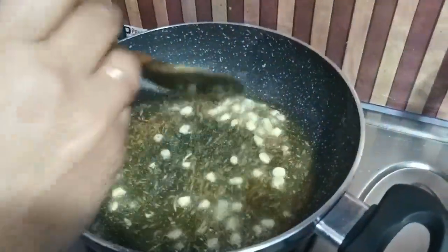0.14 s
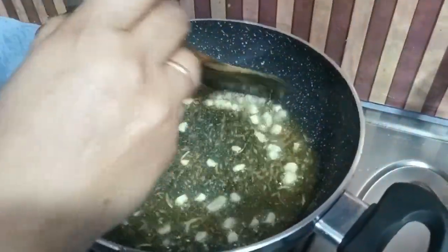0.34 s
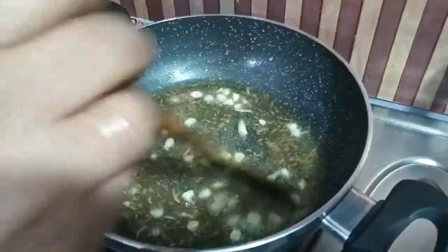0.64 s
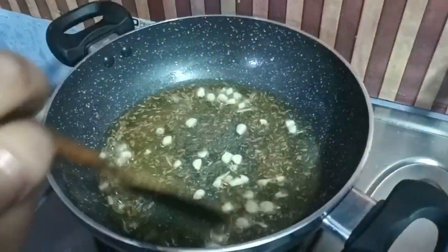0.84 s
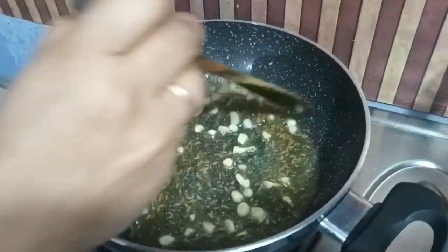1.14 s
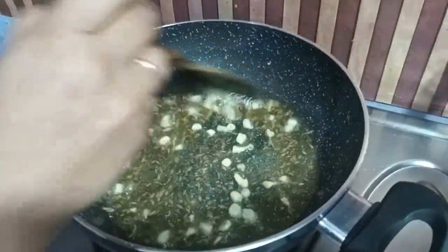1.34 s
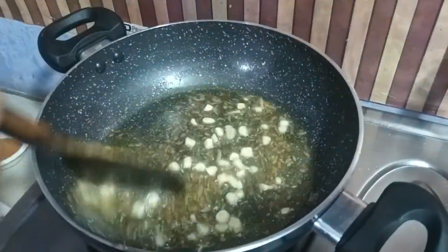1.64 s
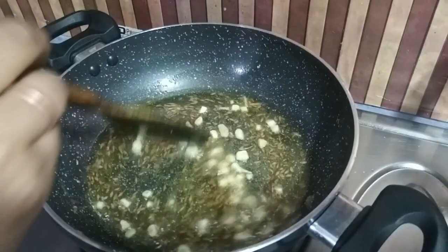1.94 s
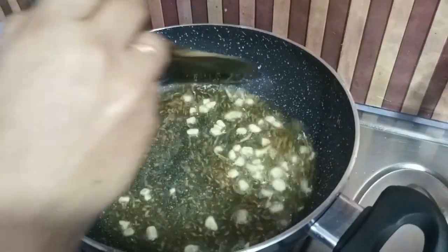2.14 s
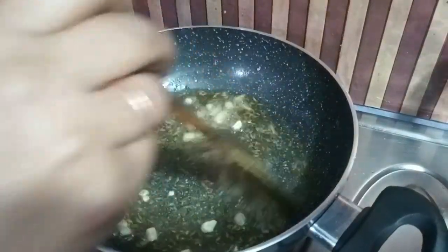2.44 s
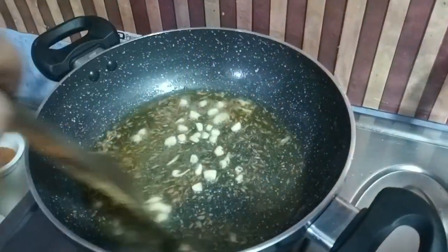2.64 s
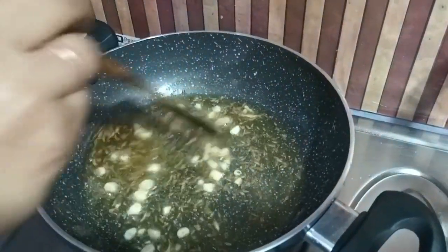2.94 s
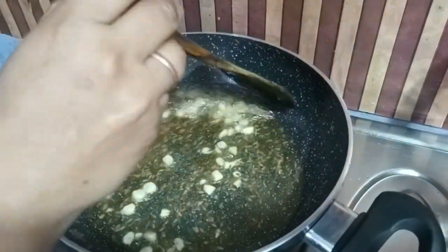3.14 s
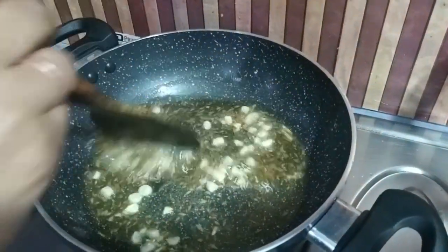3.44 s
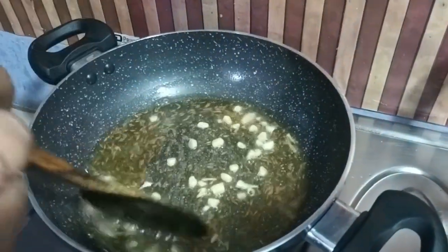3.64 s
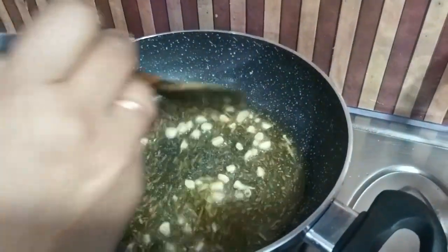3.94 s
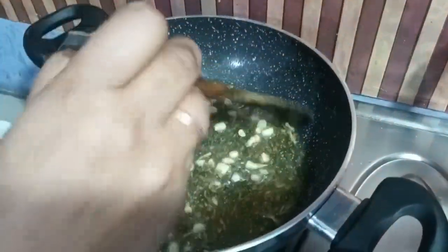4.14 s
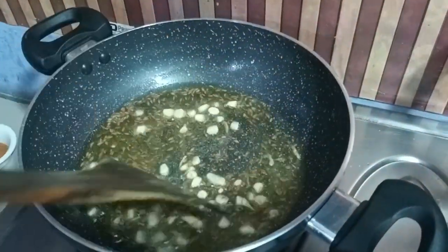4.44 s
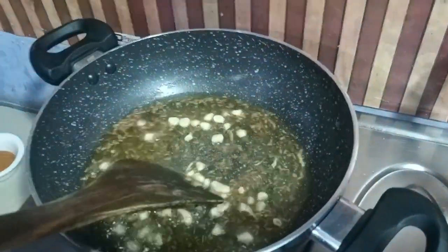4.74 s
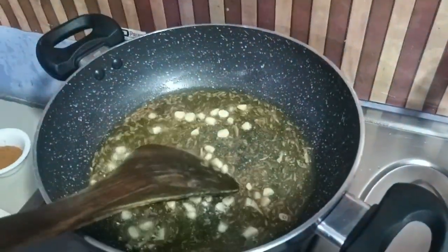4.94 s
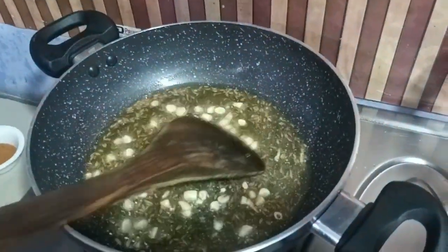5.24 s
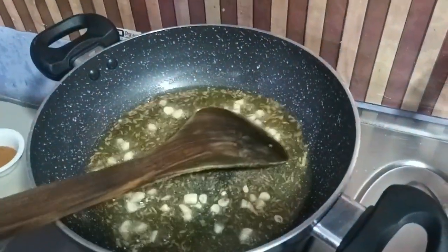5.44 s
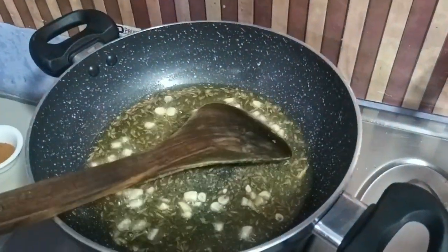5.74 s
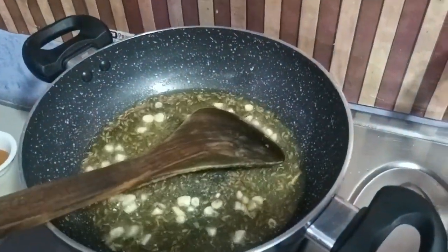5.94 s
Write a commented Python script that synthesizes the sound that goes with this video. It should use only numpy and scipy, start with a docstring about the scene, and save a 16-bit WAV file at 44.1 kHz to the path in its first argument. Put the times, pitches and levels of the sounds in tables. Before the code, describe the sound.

Garlic and seeds fry in a deep pan, heard close in a small kitchen with a short room reflection and rolled-off treble. Fine bright sizzle runs throughout, its coarser bubbling gradually fading. Two hard seed cracks come within the first 0.2 s over low spatula rubbing. A wooden knock and scrape land around 0.8-0.9, a stronger hollow clack at 1.27 with the pan ringing. Near 1.9 the blade knocks and squeaks; from 2.0 to 2.8 dull bumps, most tightly bunched around 2.5, mix with a low shudder, pops and wet spits. A rub at 2.8 precedes another loud clack at 3.2. Spits flare around 3.8-3.9, then a duller knock, bump and rub at 4.15. Afterwards mostly sizzle remains: a faint squeak at 4.8, a longer soft scrape from 5.05, a tiny crack at 5.8, and a last faint bump and touch around 5.9.

```python
"""Chopped garlic and seeds sizzle in hot oil in a deep pan, close to a phone in a small kitchen.
From the start, filtered random clicks make the steam bubbles, noise cracks make the popping seeds, and
a wooden spatula knocks and rubs the pan into its low ring, pushing wet garlic onto hot metal, which spits.
From about two seconds in, a run of dull sine bumps comes with a low noise shudder, and the edge squeaks
now and then; later the strokes are sparser and the coarse bubbles fainter, with two last soft bumps."""
import sys
import numpy as np
from scipy import signal
from scipy.fft import rfft, irfft, next_fast_len
from scipy.io import wavfile
from scipy.ndimage import uniform_filter1d

SR = 44100
rng = np.random.default_rng(int(sys.argv[2]) if len(sys.argv) > 2 else 0)


def store_wav(level_fs):
    """Save 16-bit WAV to argv[1]."""
    pcm = np.round(np.clip(np.atleast_2d(level_fs), -1, 1) * 32767)
    wavfile.write(sys.argv[1], SR, pcm.T.astype(np.int16))


N = 268991
T = np.arange(N) / SR
SECOND = T[:SR]
KITCHEN_T60_S = 0.24
TOP_HZ = 9620  # upper limit of the phone, and of a seed's crack


def undb(db):
    """Decibels to gain."""
    return 10 ** (np.asarray(db) / 20)


def unit(x):
    """Scale to rms 1."""
    return x / np.sqrt(np.mean(x ** 2))


def add(out, start_s, x):
    """Mix a sound in at a time."""
    i = max(int(start_s * SR), 0)
    out[i:i + len(x)] += x[:N - i]


def shape(x, gain):
    """Filter by a gain that is a function of frequency."""
    n = next_fast_len(len(x) + SR // 10)
    hz = np.maximum(np.arange(n // 2 + 1) * SR / n, 1)
    return irfft(rfft(x, n) * gain(hz), n)[:len(x)]


def colour(x, points):
    """Filter by a spectrum of (Hz, dB) points."""
    hz, db = np.transpose(points)
    return shape(x, lambda f: undb(np.interp(np.log(f), np.log(hz), db)))


def hump(f, hz, octaves):
    """A bell on the octave scale."""
    return np.exp(-.5 * (np.log2(f / hz) / octaves) ** 2)


def noise_hump(size, hz, octaves):
    """Noise gathered around one pitch, at rms 1."""
    return unit(shape(rng.standard_normal(size), lambda f: hump(f, hz, octaves)))


def walk(rate):
    """Smooth random wander of rms 1, with this many new targets per second."""
    k = int(SR / rate)
    steps = np.repeat(rng.standard_normal(N // k + 1), k)
    return unit(uniform_filter1d(steps, k)[:N])


def clicks(per_s, scatter_db, size):
    """Clicks at random moments, many small and a few large."""
    hit = rng.random(size) < per_s / SR
    strength = undb(scatter_db * np.minimum(rng.exponential(size=size), 5))
    return hit * strength * rng.choice([-1, 1], size)


def kitchen(x, wet_db, t60):
    """Direct sound plus a short wash from the tiles and worktop."""
    decay = np.exp(-np.log(1000) * SECOND / t60)
    tail = rng.standard_normal(SR) * decay * (SECOND > .003)
    return x + undb(wet_db) * signal.fftconvolve(x, tail / np.linalg.norm(tail))[:N]


def room_tone():
    """A faint low rumble of the kitchen, from noise that wanders in level."""
    return undb(-74) * noise_hump(N, 90, 1.0) * undb(2.5 * walk(6.4))


# Air resonances of the bowl. Each row: centre in Hz, width in Hz, boost (or dip, if negative) in dB.
BOWL = [(1280, 12, -2.5), (1359, 154, 17.5), (1856, 150, 6.5), (6660, 270, 3.5), (6900, 140, -6)]


def bowl(f):
    """Gain of the air resonances above the oil, each a peak or dip on a flat response."""
    return 1 + sum((undb(db) - 1) / (1 + (2 * (f - hz) / width) ** 2) for hz, width, db in BOWL)


# Fine fizz of the oil, as a spectrum. Each row: frequency in Hz, gain in dB.
FIZZ_SPECTRUM = [(500, -43.5), (950, -69), (1200, -26.5), (1650, -17.5), (2200, -10), (3400, -6),
                 (4900, -6.5), (5700, -1.5), (6700, 0.5), (7300, 1), (8000, -6.5), (8700, -4.5),
                 (9600, -3.5)]
# Larger bubbles around the garlic, as a spectrum. Each row: frequency in Hz, gain in dB.
COARSE_SPECTRUM = [(400, -15.5), (900, -16), (1400, -10.5), (2300, 3), (3700, 5), (5500, 3), (9000, -12)]
# Level of the frying over time. Each row: time in seconds, level in dB (before the bowl and the kitchen).
FRY_LEVEL = [(0, -43.5), (1.0, -41.5), (1.35, -43.5), (3.1, -42), (4.4, -43), (4.6, -43), (6.1, -43)]
# coarse bubbles relative to the fizz, at first and in the end, and the time constant of drying
COARSE_WET_DB, COARSE_DRY_DB, DRYING_S = -3.5, -17.5, 3.2


def sizzle():
    """Steam bubbles burst by the thousand: a fine fizz, and coarser ones that fade as the garlic dries."""
    level_db = np.interp(T, *np.transpose(FRY_LEVEL))
    coarse_db = COARSE_DRY_DB + (COARSE_WET_DB - COARSE_DRY_DB) * np.exp(-T / DRYING_S)
    fine = unit(colour(clicks(per_s=9000, scatter_db=1.5, size=N), FIZZ_SPECTRUM))
    fine = fine * undb(1.0 * walk(25))
    coarse = unit(colour(clicks(per_s=3500, scatter_db=2.0, size=N), COARSE_SPECTRUM))
    coarse = coarse * undb(coarse_db + 1.4 * walk(18))
    frying = shape(fine + coarse, bowl) * undb(level_db)
    return kitchen(frying, wet_db=-9.5, t60=KITCHEN_T60_S)


# fainter spits at random while the spatula stirs: latest moment, level, middle of an octave of pitches
STIR_END_S, SMALL_SPIT_DB, SMALL_SPIT_HZ = 4.2, -53, 3500


def small_spits(count):
    """Faint spits scattered over the stirring, as rows like those of SPITS."""
    return [(when * STIR_END_S, SMALL_SPIT_DB, SMALL_SPIT_HZ * 2 ** (pitch - .5))
            for when, pitch in rng.random((count, 2))]


# The loudest spits of wet garlic pushed over hot metal.
# Each row: middle in seconds, level in dB (before the swell), centre in Hz.
SPITS = [(.295, -44.5, 6000), (.455, -44.5, 1860), (.785, -44, 2600), (.871, -39.5, 3800),
         (1.384, -40.5, 2450), (1.993, -40, 5700), (2.277, -39, 4150), (2.358, -41.5, 4970),
         (2.611, -42.5, 7700), (3.05, -41, 3960), (3.225, -47, 3000), (3.8, -45.5, 3580), (3.9, -37, 5370),
         (5.1, -48, 3070), (5.709, -48, 5060)]
SPIT_S, SPIT_OCTAVES = 0.02, 0.35  # swell to either side, spread of pitch


def spits():
    """Moisture flashes to steam in a short swell of bubbles of like size."""
    out, t = np.zeros(N), SECOND[:SR // 4] - 1 / 8
    swell = np.exp(-2 * (t / SPIT_S) ** 2)
    for middle_s, db, hz in list(SPITS) + small_spits(count=10):
        bubbles = clicks(per_s=1600, scatter_db=0.5, size=len(t))
        swarm = unit(shape(bubbles, lambda f: hump(f, hz, SPIT_OCTAVES)))
        add(out, middle_s + t[0], undb(db) * swarm * swell)
    return kitchen(out, wet_db=-8, t60=KITCHEN_T60_S)


# Seeds popping. Each row: start in seconds, level of the crack in dB, centre in Hz, spread in octaves,
# length of the crack in seconds.
POPS = [(0.018, -24, 5270, 1.65, 0.0042), (0.1615, -24, 3720, 0.17, 0.0049), (0.705, -42, 4000, 2.3, 0.022),
        (1.225, -32, 5860, 1.5, 0.0079), (1.514, -40.5, 6000, 1.4, 0.0095),
        (1.984, -29.5, 5800, 0.13, 0.0044), (2.0747, -35, 4360, 0.62, 0.0084),
        (2.264, -35.5, 4030, 0.3, 0.0047), (2.403, -31, 3600, 0.53, 0.0055),
        (3.836, -38.5, 8100, 0.54, 0.019), (5.795, -34, 8810, 0.34, 0.0039)]
POP_LOW_HZ = 1100  # a seed is too small to radiate well below this


def pops():
    """A seed coat splits in a ragged crack of a few milliseconds or more, and the room answers."""
    out, t = np.zeros(N), SECOND[:SR // 10]
    for start_s, db, hz, octaves, length in POPS:
        def seed(f):
            """The seed's own band over a faint broad one, thinned at the bottom and cut at the top."""
            bands = hump(f, hz, octaves) + 0.15 * hump(f, 5100, 1.85)
            return bands * (f < TOP_HZ) / np.hypot(1, (POP_LOW_HZ / f) ** 2)

        crack = shape(rng.standard_normal(len(t)), seed) * np.exp(-(t / length) ** 2)
        add(out, start_s, undb(db) * crack / np.std(crack[t < length]))
    return kitchen(out, wet_db=-5.0, t60=0.16)


# around the run of bumps: middle and half length of the shudder, level before the swell, pitch
SHUDDER_MIDDLE_S, SHUDDER_HALF_S, SHUDDER_DB, SHUDDER_HZ = 2.37, 0.43, -51.5, 105


def shudder():
    """A low, uneven shudder of noise that swells and fades around the run of bumps."""
    swell = np.exp(-((T - SHUDDER_MIDDLE_S) / SHUDDER_HALF_S) ** 4)
    return undb(SHUDDER_DB) * swell * noise_hump(N, SHUDDER_HZ, 0.8)


# Dull bumps. Each row: start in seconds, peak of the thud in dB, base pitch in Hz (before the stiffening).
BUMPS = [(2.0371, -19, 115), (2.461, -21, 105), (2.4925, -16, 126.5), (2.5748, -19, 113),
         (2.786, -30.5, 85), (4.122, -29, 105), (5.908, -36, 115)]


def bumps():
    """Soft, dead blows that swell and are over in a cycle or two, sinking in pitch as the push relaxes."""
    out, t = np.zeros(N), SECOND
    stiffening = .72 + 1.6 * np.exp(-t / .006)  # factor on the base pitch
    for start_s, db, hz in BUMPS:
        cycles = hz * np.cumsum(stiffening) / SR
        thud = np.sin(2 * np.pi * cycles) * t ** 3 * np.exp(-t / 0.0027)
        add(out, start_s, undb(db) * thud / np.abs(thud).max())
        # a slight shudder around each blow
        shiver = noise_hump(SR, 1.86 * hz, 0.56) * np.exp(-((t - .03) / 0.019) ** 2)
        add(out, start_s - .025, undb(db - 19.0) * shiver)
    return out


def ring(force, hz, t60):
    """One damped mode under a force, before scaling to a level that grows with its decay time."""
    pole = np.exp((2j * np.pi * hz - np.log(1000) / t60) / SR)
    swing = signal.lfilter([1], [1, -pole], force).imag
    return unit(swing) * np.sqrt(t60 / (4 * np.log(1000)))  # first swing near 1 for a single blow


# Ring of the free pan. Each row: mode in Hz, level in dB, t60 in seconds (before damping by the wood).
PAN = [(139.2, 0, 0.46), (180.6, -4, 0.23), (247.7, -3, 0.29), (299.2, -12, 0.38), (400, -5.5, 0.27),
       (497.8, -7, 0.28), (525, -14.5, 0.12), (602, -10.5, 0.16), (671, -12.5, 0.26), (740.3, -3, 0.16),
       (804, -9, 0.22), (885, -5, 0.1), (1040, -20.5, 0.029), (1135, -13.5, 0.099), (1381, 2, 0.071),
       (1430, -15, 0.14)]
PAN_HZ = np.transpose(PAN)[0]
RIM_MODE = 2  # row of the mode in which the rim flexes


def pan_ring(force, weights, damping):
    """The pan's modes, weighted by the place of contact; damping above 1 shortens them, as wood does."""
    modes = np.zeros(len(force))
    for (hz, db, t60), weight in zip(PAN, weights):
        modes += rng.choice([-1, 1]) * weight * undb(db) * ring(force, hz, t60 / damping)
    # the pan's ring carries little below 100 Hz
    return signal.sosfilt(signal.butter(3, 100, "high", fs=SR, output="sos"), modes)


# The blade's edge catches with a squeak. Each row: middle in seconds, level in dB (before the pan joins).
SQUEAKS = [(1.897, -40), (2.818, -48.5), (4.773, -48)]
# pitch at the middle, its random roughness, swell to either side, rise in pitch
SQUEAK_HZ, SQUEAK_WIDTH_HZ, SQUEAK_S, SQUEAK_OCTAVES_PER_S = 800, 62, 0.021, 2.4
SQUEAK_RING_DB = -3  # the squeak also stirs the pan's highest modes


def squeaks():
    """The wooden edge catches: a rough, short tone rises as the blade speeds up, and the pan sings on."""
    out, t = np.zeros(N), SECOND - 1 / 8
    swell = np.exp(-2 * (t / SQUEAK_S) ** 2)
    for middle_s, db in SQUEAKS:
        hz = SQUEAK_HZ * 2 ** (SQUEAK_OCTAVES_PER_S * t) + SQUEAK_WIDTH_HZ * walk(400)[:SR]
        tone = swell * np.sqrt(2) * np.sin(2 * np.pi * np.cumsum(hz) / SR)
        scrape = swell * rng.standard_normal(SR)
        sing = unit(pan_ring(scrape, hump(PAN_HZ, 1200, 0.68), damping=0.64)) * np.std(tone)
        add(out, middle_s + t[0], undb(db) * (tone + undb(SQUEAK_RING_DB) * sing))
    return out


# pressure in every stroke: builds up, eases off, then the blade lifts
LAND_S, BUILD_DB, EASE_DB, LIFT_S = .012, 4.5, 29.5, .025
UNEVEN_DB, UNEVEN_PER_S = 1, 30  # the blade rides over seeds and garlic


def push(length, hardest):
    """Pressure of the blade over one stroke: it lands, builds, eases and lifts, never quite evenly."""
    landing = np.clip(SECOND / LAND_S, 0, 1)
    lifting = np.clip((length - SECOND) / LIFT_S + .5, 0, 1)
    effort_db = np.interp(SECOND / length, [0, min(hardest, 1), 1], [-BUILD_DB, 0, -EASE_DB])
    return landing * lifting * undb(effort_db + UNEVEN_DB * walk(UNEVEN_PER_S)[:SR])


# Spatula strokes. Each row: start in seconds, length in seconds, level in dB (before the pressure),
# hardest push as a share of the length, pitch centre of the drone in Hz, then judder, rasp and rumble
# in dB relative to the stroke.
STROKES = [(0.0, 0.37, -54, 0.48, 353, -7, -5.5, 2), (0.382, 0.35, -56, 0.58, 180, -5, -3, -20),
           (0.798, 0.12, -44.5, 0.43, 380, 9, -21, -34), (.872, .22, -33.5, 0.17, 180, -9, -10, -16),
           (1.279, 0.17, -33.5, .14, 235.5, 0, -19, -28.5), (1.383, 0.24, -38, 0.13, 284, -6.5, -12.5, -17),
           (1.6, .19, -57, 0.16, 130, -7, -32, -3), (1.892, 0.13, -39.5, .16, 125, -14.5, -12, -11),
           (2.205, .16, -45, .1, 255, 8, -15, -8.5), (2.313, 0.35, -39.5, .08, 160, -7.5, -13.5, -26),
           (2.804, .22, -35, 0.32, 165, -17, -12.5, -4.5), (3.211, 0.24, -44, 0.084, 200, -9.5, -17, -13),
           (4.15, 0.2, -41, 0.11, 250, -8, -22, -3), (5.054, .56, -41, .2, 150, -7, -13, -19),
           (5.952, 0.12, -48, 0.11, 332, 0, -32, -21)]
JUDDER_FOLLOW = 0.6  # the judder outlasts the rubbing: it goes with this power of the pressure
CONTACT_OCTAVES, UPPER_MODES_DB = .5, -19  # spread of the drone, floor for all other modes
RASP_HZ, RASP_OCTAVES, RASP_RING_DB = 850, 1, 4.5  # the rasp of the wood, and the upper modes it stirs
RUMBLE_HZ, RUMBLE_OCTAVES = 70, 0.24


def strokes():
    """The spatula sticks and slips: the pan drones, rumbles on its stand and judders at its rim mode
    where the slips lock onto it, and the wood rasps."""
    out = np.zeros(N)
    for start_s, length, db, hardest, hz, judder_db, rasp_db, rumble_db in STROKES:
        pressure = push(length, hardest)
        slips = pressure * clicks(per_s=1400, scatter_db=1.3, size=SR)
        drone_weights = hump(PAN_HZ, hz, CONTACT_OCTAVES) + undb(UPPER_MODES_DB)
        drone = unit(pan_ring(slips, drone_weights, damping=2.63))
        wood = unit(shape(slips, lambda f: hump(f, RASP_HZ, RASP_OCTAVES)))
        stirred = unit(pan_ring(slips, hump(PAN_HZ, RASP_HZ, RASP_OCTAVES), damping=1.5))
        rasp = unit(wood + undb(RASP_RING_DB) * stirred)
        rumble = unit(shape(slips, lambda f: hump(f, RUMBLE_HZ, RUMBLE_OCTAVES)))
        rub = drone + undb(rasp_db) * rasp + undb(rumble_db) * rumble
        rub = rub * np.sqrt(np.mean(pressure ** 2))
        # the judder: an unsteady tone on the rim mode
        phase = 2 * np.pi * np.cumsum(PAN_HZ[RIM_MODE] * (1 + 0.027 * walk(40)[:SR])) / SR
        shaking = (np.sin(phase) + 0.12 * np.sin(2 * phase)) * undb(2.0 * walk(50)[:SR])
        judder = pressure ** JUDDER_FOLLOW * unit(shaking)
        add(out, start_s, undb(db) * (rub + undb(judder_db) * judder))
    return out


# The wooden blade's own clack. Each row: mode in Hz, level in dB, t60 in seconds.
BLADE = [(560, -3.5, 0.027), (731, -4, 0.036), (1198, -9, 0.026)]
# Spatula knocks. Each row: start in seconds, level in dB, brightness of the contact in Hz,
# boost of the rim mode in dB.
KNOCKS = [(0.019, -40.5, 1300, -3), (0.707, -44.5, 1000, 4), (0.794, -33, 1620, 5.5),
          (0.87, -26.5, 560, 6.5), (1.27, -19, 870, -0.5), (1.894, -32, 880, -10),
          (2.316, -46.5, 397, 23.5), (3.200, -19, 1100, -1), (4.146, -31, 560, -1.5),
          (4.774, -47, 800, -3.5), (5.969, -50, 433, 11)]
# the hard edge of the blade ticks as it lands, this many times above the knock's brightness
TICK_DB, TICK_RATIO, TICK_S = -22, 2.2, 0.014


def knocks():
    """The blade clacks on the pan wall, chatters briefly and leaves it ringing; soft contact is duller."""
    out, tap = np.zeros(N), 1. * (SECOND == 0)
    for start_s, db, bright_hz, rim_db in KNOCKS:
        def contact(f):
            """A soft contact excites little above its brightness."""
            return 1 / np.hypot(1, (f / bright_hz) ** 2)

        def chatter_band(f):
            """Chatter sits below the brightness, with a faint band above."""
            return hump(f, 0.51 * bright_hz, 0.64) + 0.04 * hump(f, 2 * bright_hz, 0.68)

        weights = contact(PAN_HZ)
        # high on the wall the rim flexes more and the base less
        weights[[0, RIM_MODE]] *= undb([-rim_db / 2, rim_db])
        force = tap + 0.11 * rng.standard_normal(SR) * np.exp(-SECOND / 0.021)
        pan = pan_ring(force, weights, damping=1)
        clack = sum(contact(hz) * undb(mode_db) * ring(tap, hz, t60) for hz, mode_db, t60 in BLADE)
        chatter = shape(rng.standard_normal(SR), chatter_band) * np.exp(-SECOND / 0.026)
        chatter = chatter / np.abs(chatter).max()
        blow = undb(-9.5) * pan + undb(8.0) * clack + undb(-6.5) * chatter
        blow = blow * (1 - np.exp(-SECOND / 0.0042))  # soft onset
        tick = noise_hump(SR, TICK_RATIO * bright_hz, .7) * np.exp(-SECOND / TICK_S)
        add(out, start_s, undb(db) * (blow + undb(TICK_DB) * tick))
    return out


def scene():
    """Everything reaches one microphone, the same in both channels."""
    spatula = kitchen(knocks() + strokes() + squeaks(), wet_db=-18, t60=KITCHEN_T60_S)
    mono = room_tone() + sizzle() + spits() + pops() + shudder() + bumps() + spatula
    return np.array([mono, mono])


# the phone's noise suppressor turns the low range down when little is in it
SUPPRESS_BELOW_HZ, SUPPRESS_THRESHOLD_DB, SUPPRESS_DEPTH_DB = 520, -65, 5.5


def record(dry):
    """The phone ducks the low range whenever it falls quiet, and cuts the top steeply."""
    low = shape(dry[0], lambda f: 1 / np.hypot(1, (f / SUPPRESS_BELOW_HZ) ** 4))
    power = np.abs(uniform_filter1d(uniform_filter1d(low ** 2, SR // 40), SR // 40))
    quiet = 1 / (1 + (power / undb(SUPPRESS_THRESHOLD_DB) ** 2) ** 2)  # near 1 below the threshold
    ducked = dry - quiet * (1 - undb(-SUPPRESS_DEPTH_DB)) * low
    return signal.sosfilt(signal.ellip(14, .2, 75, TOP_HZ, fs=SR, output="sos"), ducked)


dry = scene()
out = record(dry)
store_wav(out)
```